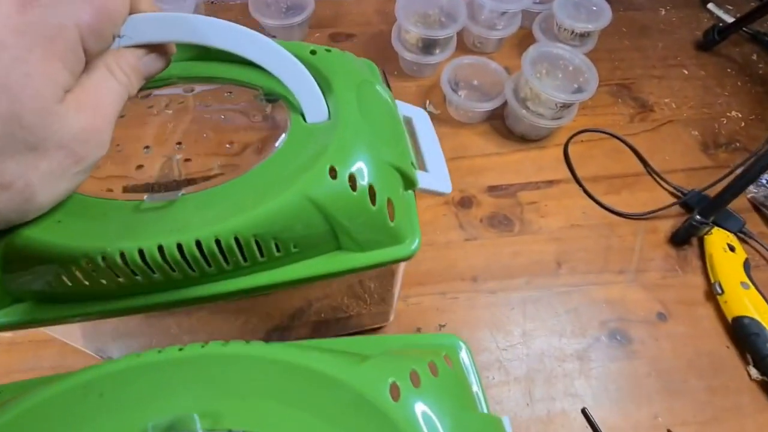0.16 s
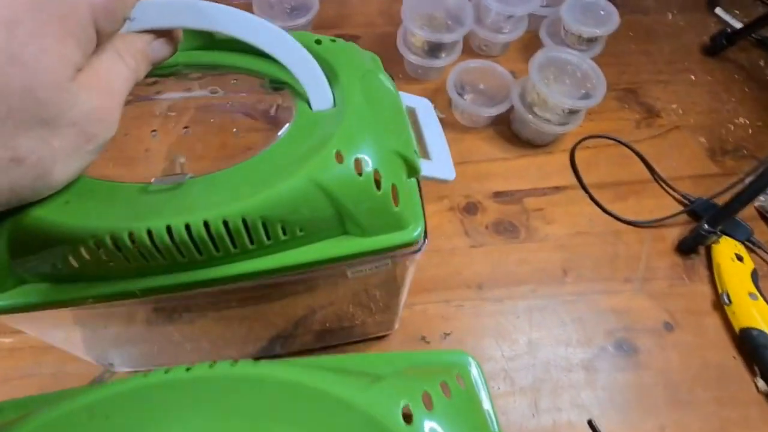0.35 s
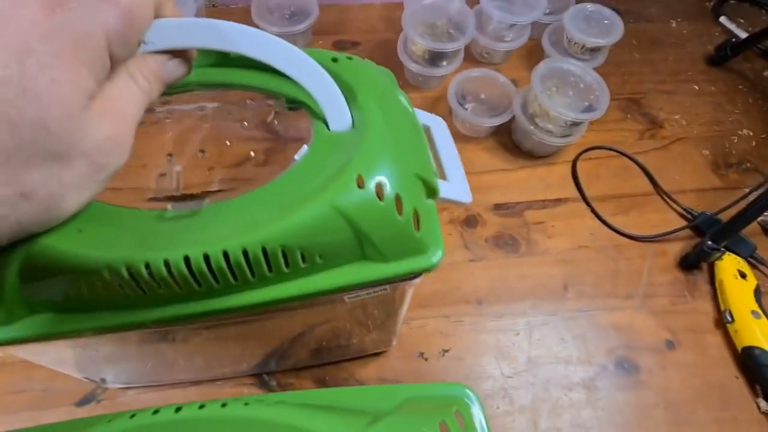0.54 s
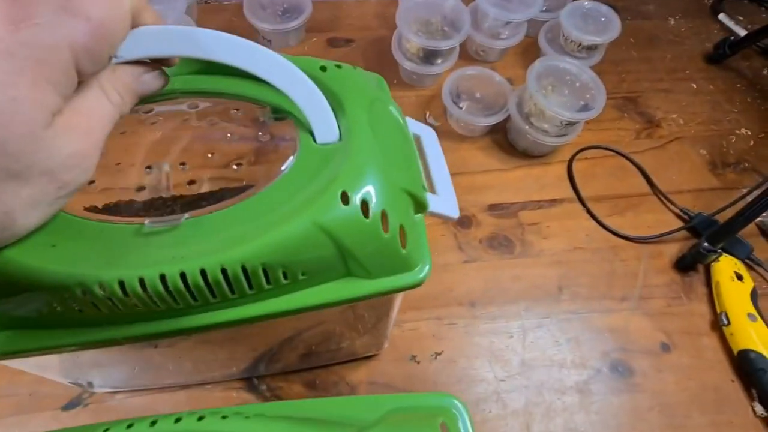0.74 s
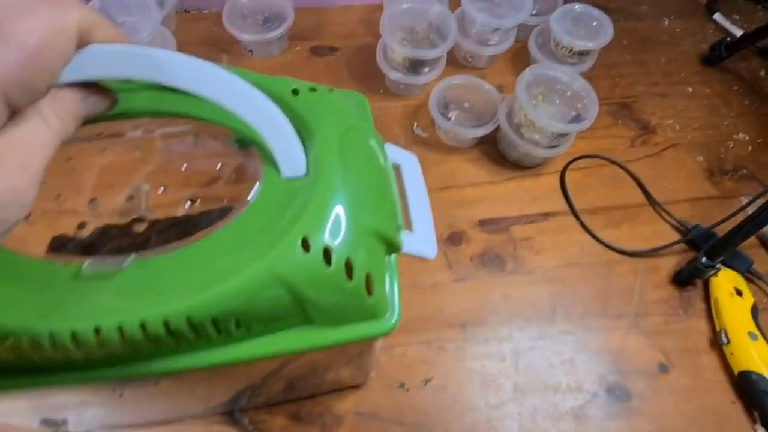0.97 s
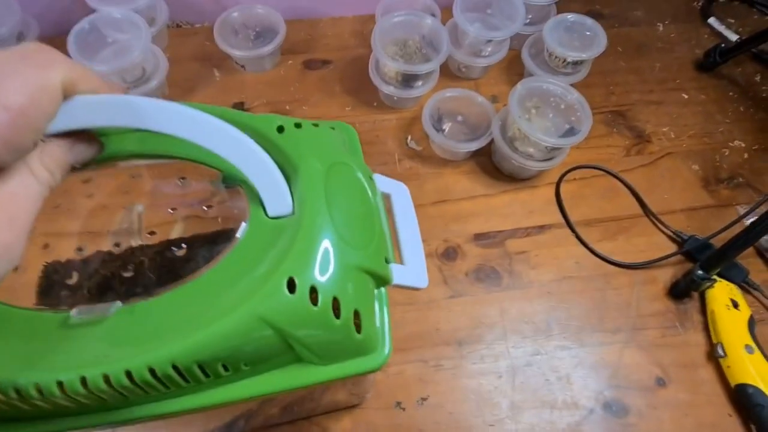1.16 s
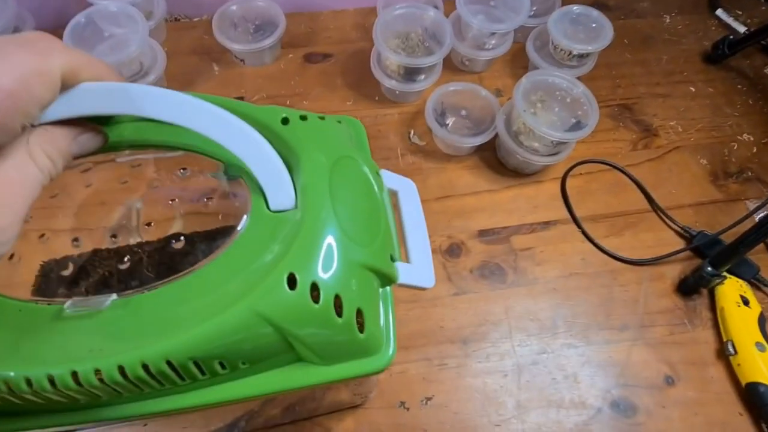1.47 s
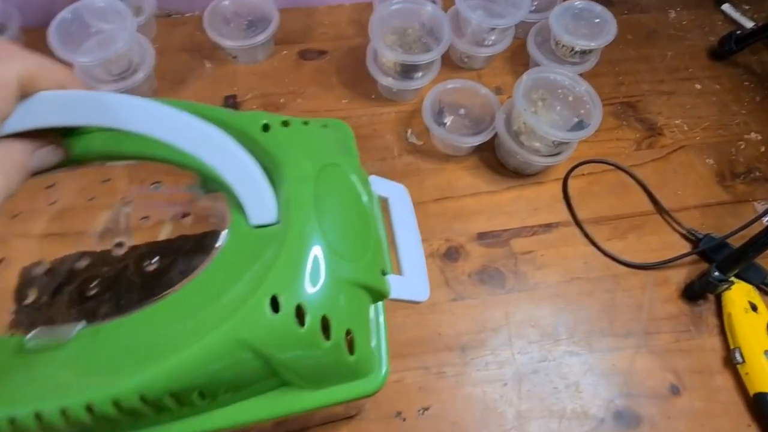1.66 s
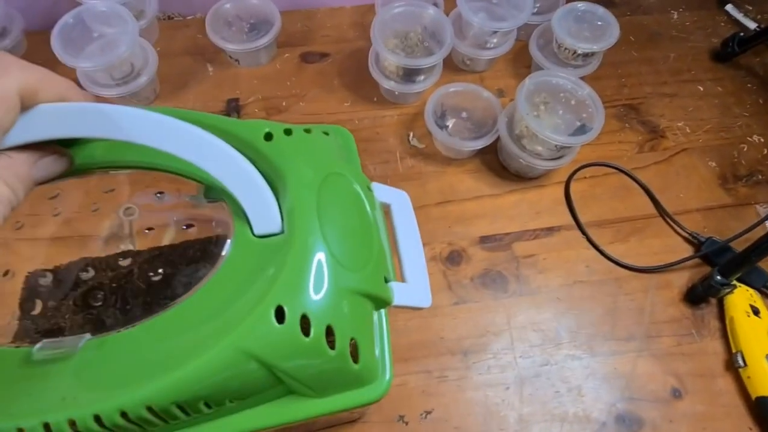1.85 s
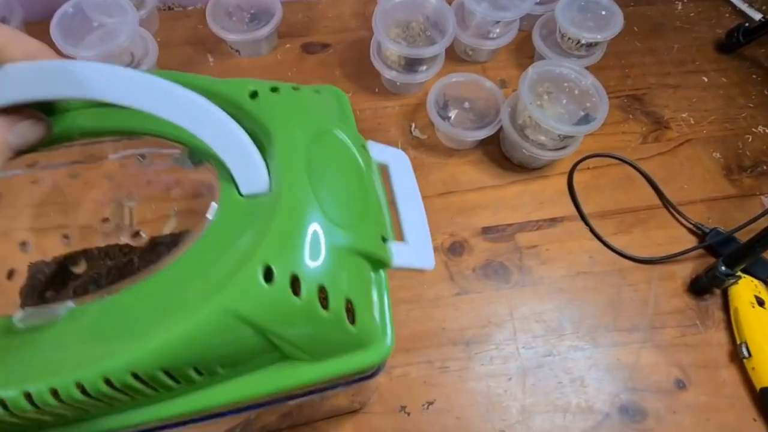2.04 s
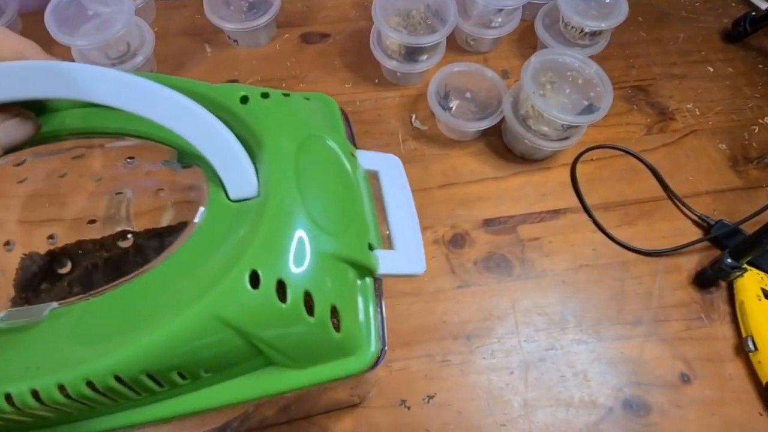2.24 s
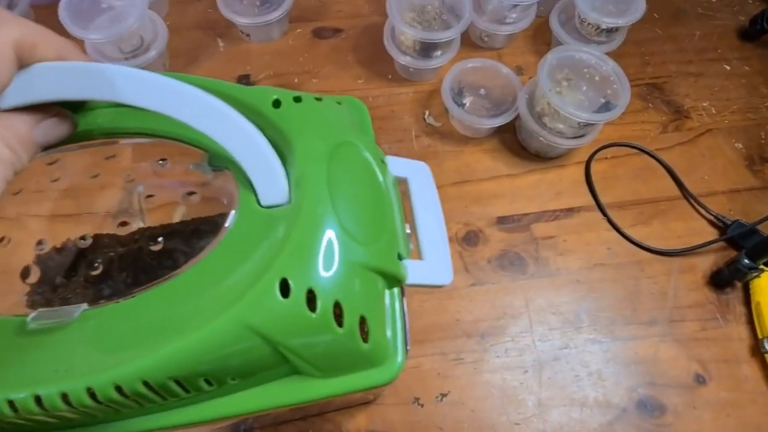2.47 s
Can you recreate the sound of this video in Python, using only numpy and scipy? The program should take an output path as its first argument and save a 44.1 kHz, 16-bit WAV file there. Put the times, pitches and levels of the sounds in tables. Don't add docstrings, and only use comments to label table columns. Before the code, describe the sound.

Plastic knocks, rubs and sharp clicks as a lid is fitted and pressed onto a small tub

```python
import sys
import numpy as np
from scipy import signal
from scipy.fft import rfft, irfft, next_fast_len
from scipy.io import wavfile
from scipy.ndimage import map_coordinates

SR = 44100
rng = np.random.default_rng(int(sys.argv[2]) if len(sys.argv) > 2 else 0)


def master_out(mix):
    frames = np.transpose(np.atleast_2d(mix))
    ceiling = np.clip(frames, -1, 1)
    pcm = np.round(ceiling * 32767).astype(np.int16)
    wavfile.write(sys.argv[1], SR, pcm)


def nominal_scale(level):
    x = np.asarray(level, float) / 20
    return 10 ** x


N = 114660


def unit(x):
    return x / np.sqrt(np.mean(x ** 2) + 1e-20)


def peak_one(x):
    return x / np.abs(x).max()


def along(points, hz):
    point_hz, value = np.transpose(points)
    return np.interp(np.log(hz + 1), np.log(point_hz + 1), value)


def filtered(x, response):
    size = next_fast_len(x.shape[-1] + 2048)
    spectrum = rfft(x, size) * response(np.fft.rfftfreq(size, 1 / SR))
    return irfft(spectrum, size)[..., :x.shape[-1]]


def add(track, start_s, x):
    track[round(start_s * SR):][:len(x)] += x


# start_s, level_db, thud_over_snap_db, crack_over_snap_db
FITTING_CONTACTS = [(0.0727, -38.5, -14, -43), (0.0897, -28, -8.5, -30), (0.1019, -38, -15, -7.5),
                    (0.1419, -36, -0.5, -15.5), (0.2677, -27, -0.5, -22), (0.2984, -35, 6.5, -32.5),
                    (0.3194, -39.5, -30.5, -17.5), (0.3592, -36, 1, -2.5), (0.391, -28.5, -24, -6.5),
                    (0.406, -23.5, -4, -16), (0.4606, -33.5, -0.5, -1.5), (0.6105, -50, 1.5, -34),
                    (0.7524, -33.5, -2, -16.5), (0.8089, -44, 8.5, -7.5), (0.8836, -36, -4.5, -22.5),
                    (0.8934, -23.5, -11.5, -5.5), (0.9866, -48, 2.5, -19), (1.0146, -46, 5.5, -17),
                    (1.0674, -49.5, -39, -25)]
# start_s, level_db, thud_over_snap_db, crack_over_snap_db
PRESSING_CONTACTS = [(1.1541, -59, 3.5, -37), (1.3169, -59.5, 6, -30), (1.3635, -49, 9, -36),
                     (1.3972, -38.5, -3, -32), (1.4203, -56, 9, -28), (1.4526, -33, -2, -19),
                     (1.4759, -54, 4.5, -30), (1.5531, -54, -7.5, -29), (1.659, -63.5, -30.5, -49),
                     (1.7629, -77, -1, 3), (1.9265, -25.5, -14, -0.5), (1.9471, -29.5, -4.5, -2),
                     (2.0683, -45, 8.5, -46), (2.1159, -34.5, 3, -45.5), (2.2522, -39.5, -6.5, -11),
                     (2.2643, -39, -7, -17), (2.3962, -31, -0.5, 0.5), (2.4072, -24.5, -5, -12.5),
                     (2.415, -43, 12, -18.5)]
# pitch_hz, level_db_per_hz
PANEL_COLOUR = [(300, -8.5), (900, 3), (1300, 2), (1800, 7.5), (3200, -16), (6000, -15), (15000, -76.5)]
# pitch_hz, level_db, t60_s
LID_MODES = [(990, 10, 0.016), (1560, -2, 0.068), (1830, 2, 0.022), (1964, 3, 0.035), (2795, 4, 0.018)]
LID_MODES_DB, LID_RISE_S = -3.5, 1e-4
# pitch_hz, level_db_per_hz
CRACK_COLOUR = [(1500, -7.5), (5000, 3.5), (9000, -3.5), (15000, -7.5)]
CRACK_T60_S = 0.009


def contacts(count=14):
    snap_db, thud_db, crack_db = 3.5, 0.5, 5
    panel_t60_s, chatter_s, lead_s = 0.013, 0.005, 0.02
    first_tick_db, tick_scatter_db, chatter_fade_db, lead_in_db = 10.5, 3.5, 3.5, -10
    out = np.zeros(N + SR)
    is_lead_in = np.arange(count) > 9
    for start_s, level_db, thud_over_db, crack_over_db in list(FITTING_CONTACTS) + list(PRESSING_CONTACTS):
        when = rng.exponential(size=count)
        size = rng.standard_normal(count) * nominal_scale(tick_scatter_db * rng.standard_normal(count))
        size = size * nominal_scale(-chatter_fade_db * when + lead_in_db * is_lead_in)
        when = when * np.where(is_lead_in, -1, 1)
        when[0], size[0] = 0, nominal_scale(first_tick_db)
        tick_s = np.clip(lead_s + 0.002 + when * chatter_s, 0, 0.06)
        ticks = np.bincount((tick_s * SR).astype(int), size, SR // 16)
        at_s = start_s - lead_s
        add(out, at_s, nominal_scale(level_db + snap_db) * burst(PANEL_COLOUR, ticks, panel_t60_s))
        add(out, at_s, nominal_scale(level_db + crack_over_db + crack_db) * burst(CRACK_COLOUR, ticks, CRACK_T60_S))
        add(out, at_s, nominal_scale(level_db + LID_MODES_DB) * struck(ticks, LID_MODES, LID_RISE_S))
        add(out, at_s, nominal_scale(level_db + thud_over_db + thud_db) * tub(ticks))
    return out[:N]


def burst(colour, ticks, t60_s):
    t = np.arange(SR // 8) / SR
    power = np.abs(signal.fftconvolve(ticks ** 2, nominal_scale(-120 * t / t60_s)))

    def half_colour(hz):
        return nominal_scale(along(colour, hz) / 2)

    noise = filtered(rng.standard_normal(len(power)), half_colour)
    return peak_one(filtered(noise * np.sqrt(power), half_colour))


def ring(modes, rise_s):
    level_scatter_db, detune = 2.5, 0.025
    t = np.arange(SR // 5) / SR
    pitch_hz, level_db, t60_s = np.transpose(modes)[:, :, None]
    level_luck, pitch_luck = rng.standard_normal((2, len(modes), 1))
    decay = nominal_scale(level_db + level_scatter_db * level_luck - 60 * t / t60_s)
    tone = np.sin(2 * np.pi * pitch_hz * (1 + detune * pitch_luck) * t)
    return peak_one(np.sum(decay * tone, 0) * (1 - np.exp(-t / rise_s)))


def struck(ticks, modes, rise_s):
    return peak_one(signal.fftconvolve(ticks, ring(modes, rise_s)))


# pitch_hz, level_db, t60_s
TUB_MODES = [(160, -19.5, 0.11), (208.3, 0, 0.034), (238.3, -1.5, 0.038), (270.8, 4, 0.027),
             (329, -3.5, 0.034), (470.6, -1, 0.036), (576.6, -8.5, 0.037), (640, -23.5, 0.033)]
# pitch_hz, level_db_per_hz
WALL_COLOUR = [(100, -15.5), (160, 6), (280, 6.5), (480, 1.5), (750, -7), (1200, -51)]


def tub(ticks):
    walls_db, walls_t60_s, thud_rise_s = -1.5, 0.045, 0.0022
    rush = burst(WALL_COLOUR, ticks, walls_t60_s)
    return struck(ticks, TUB_MODES, thud_rise_s)[:len(rush)] + nominal_scale(walls_db) * rush


# start_s, length_s, pressure_db, tub_weight_db, grit_db
RUB_STROKES = [(0.018, 0.063, -60.5, 6, -37), (0.033, 0.13, -41.5, 0.5, -23), (0.117, 0.08, -47, 5, -18),
               (0.185, 0.095, -63, 10, -28), (0.274, 0.1, -42, 4, -12), (0.331, 0.11, -38.5, 1.5, -7),
               (0.448, 0.08, -51, 2, -7), (0.689, 0.085, -61.5, 8.5, -12), (0.754, 0.085, -59.5, 5, -2),
               (0.878, 0.028, -38.5, 1.5, -17), (0.971, 0.12, -54.5, 5, -20), (1.072, 0.12, -76, 12.5, -29),
               (1.184, 0.13, -72.5, 8.5, -26), (1.348, 0.13, -57.5, 5.5, -19), (1.44, 0.072, -47.5, 4, -22),
               (1.542, 0.06, -77.5, 10, -29), (1.719, 0.1, -81.5, 6.5, -26),
               (1.898, 0.031, -71.5, -26, 7.5), (1.926, 0.041, -37.5, -0.5, -7), (1.95, 0.2, -53, 7, -18),
               (2.232, 0.054, -47, 2.5, -19), (2.296, 0.077, -77.5, 15.5, -20),
               (2.373, 0.057, -37.5, 1, -13)]


def rubbing():
    slips_per_s, slip_scatter_db, slip_t60_s, crest_db = 1800, 3, 0.0052, 10
    out, t = np.zeros(N + SR), np.arange(SR // 4) / SR
    for start_s, length_s, pressure_db, tub_weight_db, grit_db in RUB_STROKES:
        chance, direction, size = rng.random((3, len(t)))
        swell = np.sin(np.pi * np.clip(t / length_s, 0, 1)) ** 3
        slips = swell * (chance < slips_per_s / SR) * np.sign(direction - 0.5)
        slips = slips * nominal_scale(-slip_scatter_db * np.log(size + 0.00048))
        level_db = pressure_db + crest_db
        add(out, start_s, nominal_scale(level_db) * burst(PANEL_COLOUR, slips, slip_t60_s))
        add(out, start_s, nominal_scale(level_db + grit_db) * burst(CRACK_COLOUR, slips, slip_t60_s))
        add(out, start_s, nominal_scale(level_db + LID_MODES_DB) * struck(slips, LID_MODES, LID_RISE_S))
        add(out, start_s, nominal_scale(level_db + tub_weight_db) * tub(slips))
    return out[:N]


# start_s, level_db, pitch_hz, t60_s
CLEAR_NOTES = [(0.041, -49, 1610, 0.11), (0.271, -21.5, 294, 0.1), (.272, -33.5, 657, 0.059),
               (0.075, -33, 1780, 0.035), (.14, -49, 3640, .05), (.394, -34, 6500, 0.014),
               (.411, -32, 2803, 0.035), (.612, -44.5, 634, 0.049), (0.701, -29, 270, 0.047),
               (0.704, -37, 146, 0.055), (0.901, -16, 160, 0.078), (1.074, -71, 2750, 0.051),
               (1.1, -59, 1730, 0.051), (1.157, -67, 1585, 0.11), (1.254, -44, 256, 0.091),
               (1.318, -51, 461, 0.15), (1.453, -42, 1974, 0.058), (1.554, -62, 2700, 0.036),
               (1.572, -43.5, 238, 0.06), (1.591, -46, 160, 0.096), (1.575, -65.5, 1660, 0.15),
               (1.658, -51.5, 1560, 0.029), (1.664, -63.5, 2680, 0.028), (1.721, -69.5, 1440, 0.087),
               (1.722, -55, 249, 0.058), (1.761, -63.5, 2690, 0.052), (1.762, -60.5, 1720, .04),
               (1.761, -47.5, 209, 0.065), (1.947, -26.5, 473, 0.11), (1.93, -33.5, 283, 0.092),
               (2.029, -27.5, 215, 0.11), (2.126, -40, 242, .07), (2.261, -31.5, 218.6, 0.11),
               (2.289, -36, 160, 0.18), (2.41, -15.5, 290, 0.023), (2.411, -21, 466, 0.032),
               (2.42, -31, 608, .04)]


def notes():
    flutter_depth_db, flutter_per_s = 3, 150
    out, t = np.zeros(N + SR), np.arange(SR // 5) / SR
    for start_s, level_db, pitch_hz, t60_s in CLEAR_NOTES:
        wander = map_coordinates(rng.standard_normal(64), [t * flutter_per_s])
        flutter_db = flutter_depth_db * wander * np.minimum(pitch_hz / 1000, 1)
        tone = np.sin(2 * np.pi * pitch_hz * t) * (1 - np.exp(-t * pitch_hz / 2))
        add(out, start_s, nominal_scale(level_db + flutter_db - 60 * t / t60_s) * tone)
    return out[:N]


# start_s, level_db, pitch_hz
RIM_EDGES = [(0.0756, -30, 1870), (0.089, -28, 2120), (0.0921, -16, 1820), (.1028, -34, 1860),
             (0.2691, -26, 1970), (0.312, -29.5, 2950), (0.4067, -22.5, 2000), (.4125, -31.5, 2830),
             (0.4603, -34, 3000), (0.6143, -50.5, 3100), (0.7037, -47, 1780), (0.7532, -35.5, 2600),
             (0.8116, -39, 1690), (.8985, -21, 2320), (1.0145, -47, 1830), (1.0437, -46, 1900),
             (1.1554, -60, 2540), (1.3975, -49, 2760), (1.928, -18, 2550), (1.9286, -23.5, 2300),
             (1.9487, -29.5, 617), (1.953, -29, 3900), (2.1178, -43.5, 1970), (2.2535, -39, 2080),
             (2.3992, -29, 2430)]


def edges():
    t60_cycles, spike_db = 11, -9
    out, t = np.zeros(N + SR), np.arange(SR // 30) / SR
    spike = nominal_scale(spike_db) * np.exp(-t * SR / 2)
    for start_s, level_db, pitch_hz in RIM_EDGES:
        cycles = nominal_scale(-60 * t * pitch_hz / t60_cycles) * np.sin(2 * np.pi * pitch_hz * t)
        add(out, start_s, nominal_scale(level_db) * (cycles - spike))
    return out[:N]


# start_s, level_db
HINGE_TICKS = [
    (.642, -45),
    (1.765, -59),
    (2.118, -43),
    (2.316, -52),
]


def hinge():
    out = np.zeros(N + SR)
    for start_s, level_db in HINGE_TICKS:
        add(out, start_s, nominal_scale(level_db) * burst(CRACK_COLOUR, np.array([1, 0, 0.5]), CRACK_T60_S))
    return out[:N]


# start_s, level_db
BENCH_BUMPS = [(0.004, -50), (0.068, -39), (0.141, -30), (0.269, -27), (0.322, -25), (0.413, -27),
               (0.535, -37.5), (0.63, -45.5), (0.749, -47.5), (0.821, -38), (0.888, -25), (1.048, -33),
               (1.108, -55), (1.277, -57), (1.369, -44), (1.455, -28), (1.617, -54), (1.786, -53.5),
               (1.951, -33), (2.038, -35.5), (2.129, -34.5), (2.263, -29), (2.311, -45), (2.408, -26),
               (2.441, -34.5)]
# pitch_hz, level_db, t60_s
BENCH_MODES = [(50.05, -2.5, 0.27), (67.66, 8.5, .17), (82.5, -3.5, 0.17)]


def bumps():
    bump_db, rise_s = -1.5, 0.016
    out = np.zeros(N + SR)
    for start_s, level_db in BENCH_BUMPS:
        add(out, start_s, nominal_scale(level_db + bump_db) * ring(BENCH_MODES, rise_s))
    return out[:N]


def leftover():
    level_db, t60_s = -54, 0.16
    tail = burst(PANEL_COLOUR, np.ones(1), t60_s) + burst(WALL_COLOUR, np.ones(1), t60_s)
    return nominal_scale(level_db) * np.pad(tail, (0, N - len(tail)))


def near_echoes(x, count=8, stretches=40):
    level_db, longest_s, low_hz = 0, 0.008, 400
    echo, step = np.zeros((2, N + SR)), -(-N // stretches)
    for k in range(stretches):
        taps = []
        for _ in range(2):
            delay = (rng.uniform(0.1, 1, count) * longest_s * SR).astype(int)
            taps.append(np.bincount(delay, rng.standard_normal(count), SR // 50))
        taps = np.array(taps) / np.sqrt(count)
        part = signal.fftconvolve(x[None, k * step:(k + 1) * step], taps, axes=1)
        echo[:, k * step:][:, :part.shape[1]] += part
    return nominal_scale(level_db) * filtered(echo[:, :N], lambda hz: hz ** 2 / (hz ** 2 + low_hz ** 2))


# pitch_hz, t60_s
ROOM_DECAY = [(80, 0.28), (200, 0.14), (500, 0.13), (3000, 0.15), (12000, 0.15)]


def room(x, stretches=9):
    level_db, delay_samples, side_low_hz = -1.5, 180, 350
    out, step = np.zeros((2, N + SR)), -(-N // stretches)
    for k in range(stretches):
        hz, t, z = signal.stft(rng.standard_normal((2, SR // 3)), SR, nperseg=256)
        decay = nominal_scale(-60 * t / along(ROOM_DECAY, hz)[:, None])
        mid, side = signal.istft(z * decay, SR, nperseg=256)[1]
        side = filtered(side, lambda f: f ** 2 / (f ** 2 + side_low_hz ** 2))
        tail = np.array([mid + side, mid - side])
        tail = tail / np.linalg.norm(tail[0])
        wet = signal.fftconvolve(x[None, k * step:(k + 1) * step], tail, axes=1)
        out[:, k * step + delay_samples:][:, :wet.shape[1]] += wet
    return nominal_scale(level_db) * out[:, :N]


# pitch_hz, level_db_per_hz
HISS_COLOUR = [(18, -32.5), (30, 3.5), (87, -1), (136, -15.5), (1060, -29.5), (1600, -26), (15000, -44)]


def hiss():
    level_db = -73
    noise = filtered(rng.standard_normal((2, N)), lambda hz: nominal_scale(along(HISS_COLOUR, hz)))
    return nominal_scale(level_db) * unit(noise)


def scene():
    delay_s = np.array([[0], [0.0002638]])
    plastic = contacts() + rubbing() + notes() + edges() + hinge() + leftover()
    direct = np.array([plastic + bumps()] * 2)
    direct = filtered(direct, lambda hz: np.exp(-2j * np.pi * hz * delay_s))
    return direct + near_echoes(plastic) + room(plastic) + hiss()


def top_cut(x):
    return signal.sosfilt(signal.butter(12, 16660, fs=SR, output="sos"), x)


def record(dry):
    low_hz, top_hz = 45.3, 15700

    def response(hz):
        bass_cut = (1j * hz / (low_hz + 1j * hz)) ** 2
        return bass_cut / (1 + (hz / top_hz) ** 80)

    return top_cut(filtered(dry, response))


dry = scene()
out = record(dry)
master_out(out)
```